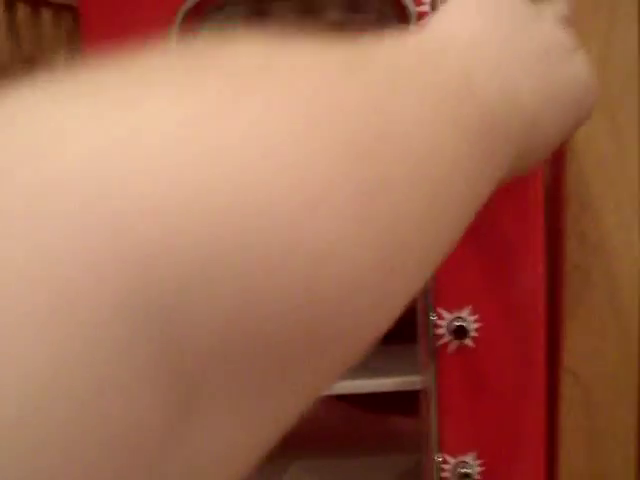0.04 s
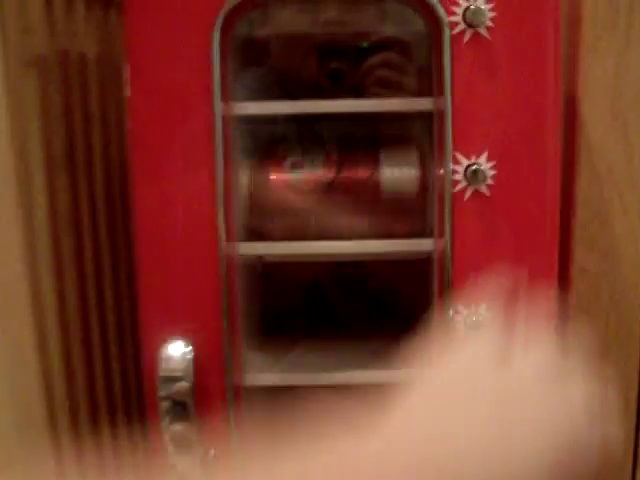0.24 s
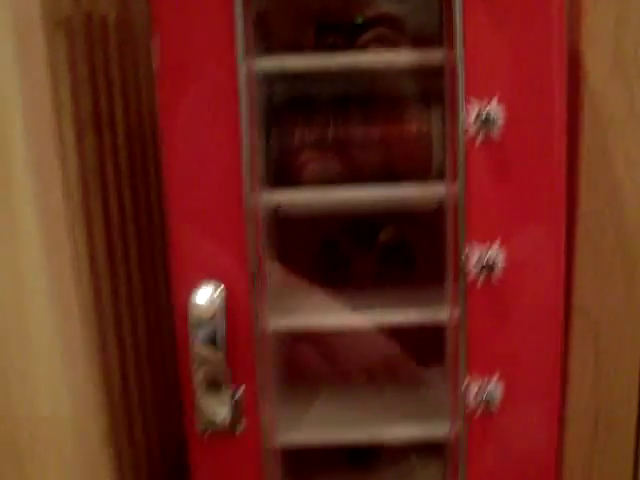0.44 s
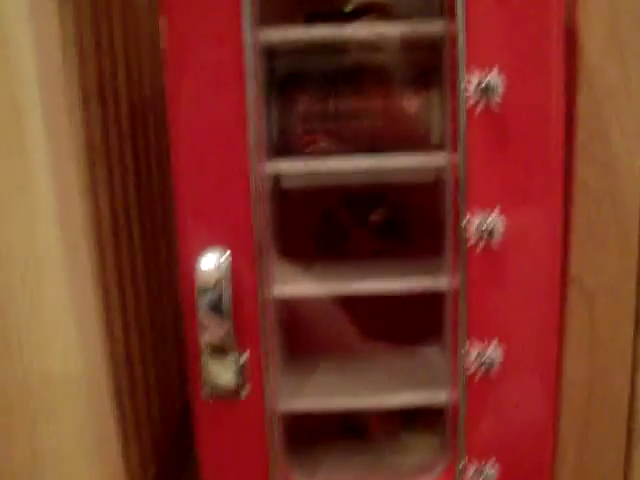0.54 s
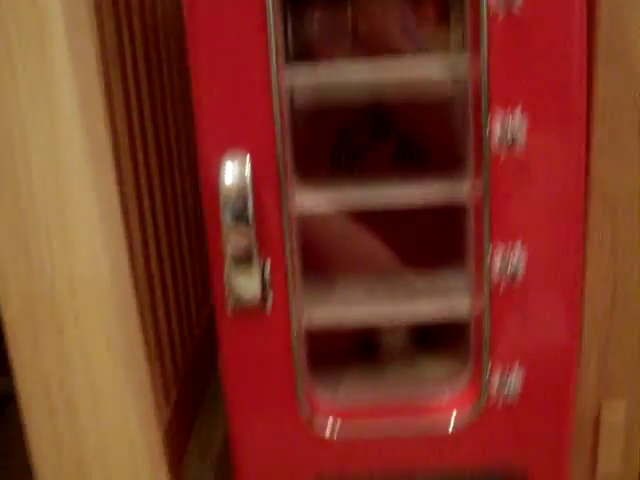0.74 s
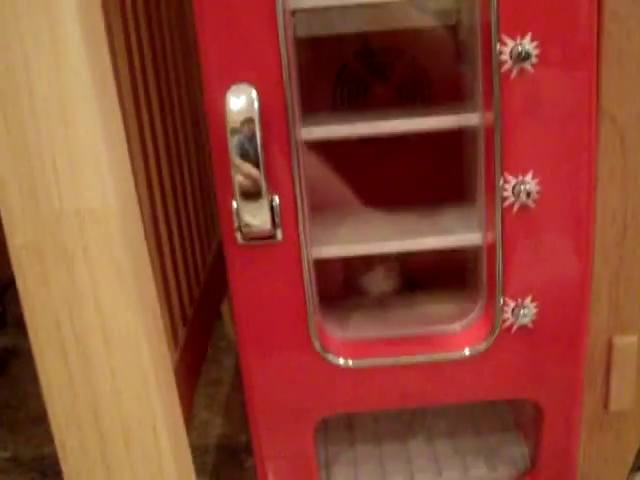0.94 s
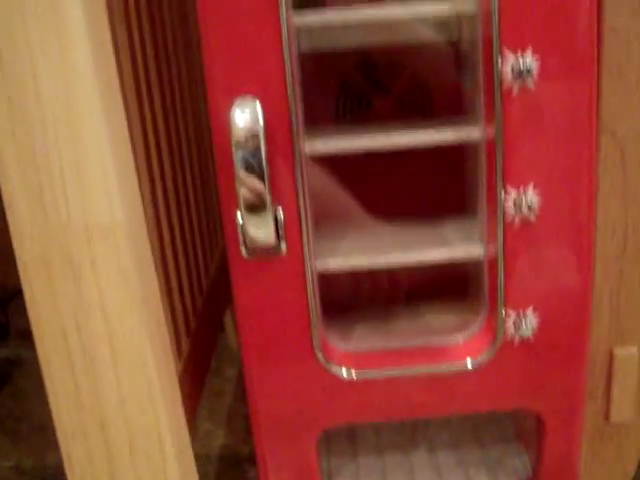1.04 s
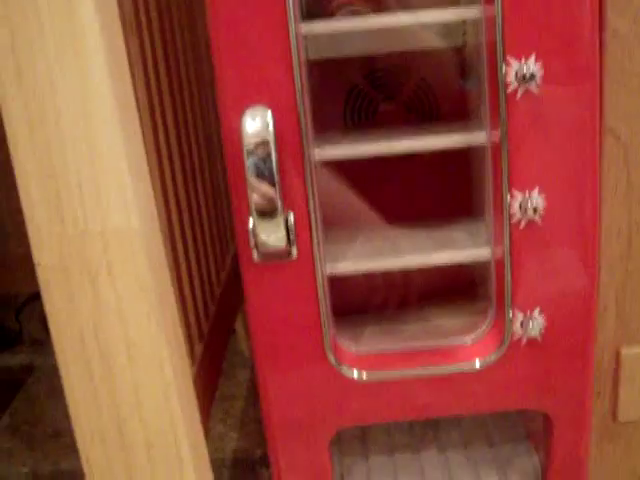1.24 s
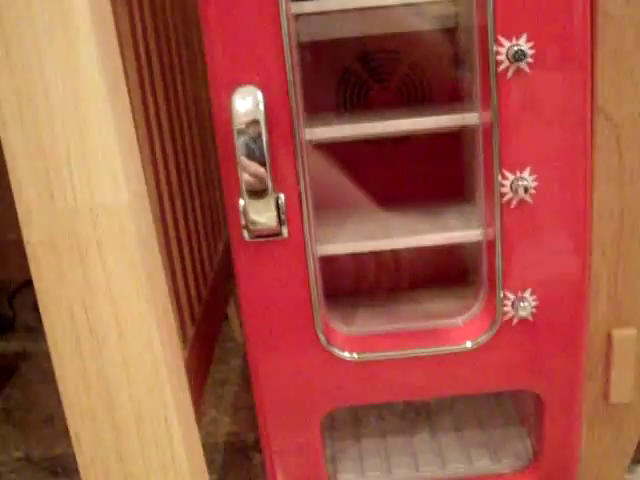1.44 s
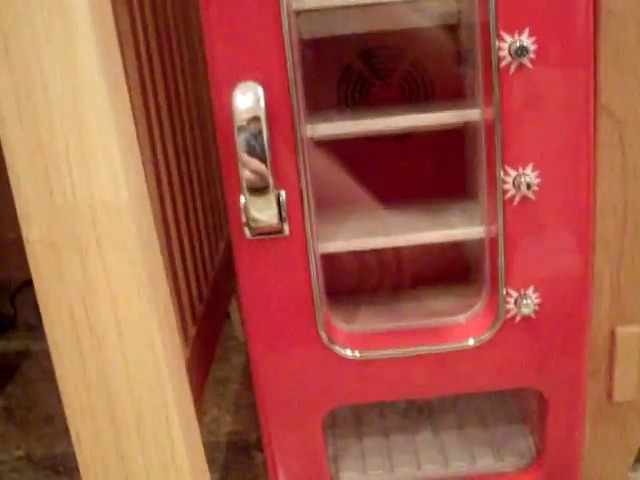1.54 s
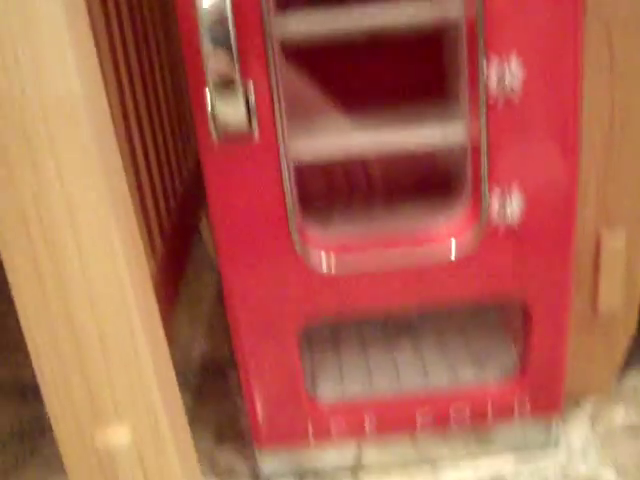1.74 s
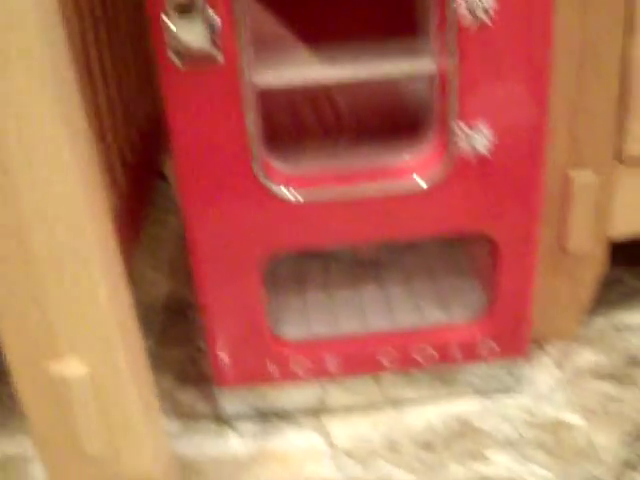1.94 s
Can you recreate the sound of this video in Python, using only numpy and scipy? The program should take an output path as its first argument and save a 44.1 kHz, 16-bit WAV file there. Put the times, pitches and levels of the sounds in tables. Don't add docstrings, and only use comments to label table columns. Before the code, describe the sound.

A can drops through a small vending fridge: a sharp latch snap, loud booming thuds and knocks, a short gap, then a thunk in the plastic tray with quick bounces, over fan hum, close distorted microphone.

```python
import sys
import numpy as np
from scipy import signal
from scipy.fft import rfft, irfft
from scipy.io import wavfile
from scipy.ndimage import uniform_filter1d

SR = 44100
rng = np.random.default_rng(int(sys.argv[2]) if len(sys.argv) > 2 else 0)


def dump_mix(stems):
    frames = np.atleast_2d(stems).T
    limited = np.clip(frames, -1, 1)
    pcm = np.round(limited * 32767).astype(np.int16)
    wavfile.write(sys.argv[1], SR, pcm)


def undo_db(level):
    steps = np.asarray(level, float) / 20
    return 10 ** steps


N = 85995

# start in seconds, cabinet boom in dB, crack in dB,
# boom centre in Hz, damping factor (a multiplier of every decay time).
RELEASE_BLOWS = [
    (.003, -39, -37, 400, 3.3),
    (.122, -23, -41, 140, 2.5),
    (0.168, -39, -31, 990, 0.49),
    (.174, -44.5, -26, 905, 4.5),
    (.194, -25, -2.5, 863, 0.57),
    (0.231, -29, -25.5, 324, 1.2),
    (0.275, -2.5, -23.5, 183.5, 1.7),
    (.279, -19, -24, 466, 0.79),
    (0.309, -24, -34.5, 117, 0.38),
]
TUMBLE_BLOWS = [(.359, 12.5, -11, 159.5, 0.4), (0.367, 2.5, -4.5, 420, 0.48),
                (.374, 9.5, -5.5, 289.7, 0.52), (0.402, 0.5, -19.5, 250, 1.07), (.419, 6, -12.5, 130, 0.27),
                (.427, 16.5, 7.5, 520, 0.43), (.435, 8, -10.5, 165, 0.95), (.458, 9, -8.5, 117, 0.93),
                (.485, -10.5, -14.5, 280, 1.36), (.498, -11.5, -13.5, 300, .8),
                (0.511, -14.5, -19.5, 500, 2.6), (.546, 9.5, -4, 420, 0.35), (.549, 2.5, -16, 173.7, .75),
                (.570, -2.5, -13.5, 270, 0.7), (.595, -3.5, -30, 125, 0.74), (.624, -6, -12.5, 605, 0.53),
                (.626, -9.5, -44, 400, 0.38), (.630, -7.5, -21.5, 181.3, 0.99), (.672, -15, -23, 520, 0.49),
                (0.676, -10, -33, 175, 1.2), (.720, -26, -38.5, 170, 2.6), (0.821, -27, -47, 80, 2.7)]
LANDING_BLOWS = [(1.035, -20, -38.5, 194, 1.1), (1.091, -17, -22, 253, 0.74),
                 (1.109, -17.5, -38.5, 231.5, 1.1), (1.134, -4.5, -30, 185.6, .55),
                 (1.137, -12.5, -42, 464, .55), (1.160, 7.5, 0.5, 443, 0.67), (1.168, 8, -7.5, 179.2, 1.05),
                 (1.194, -7, -22, 303, 0.37), (1.206, -8, -23, 112, 1.7), (1.220, 0.5, -16, 241.5, 0.59),
                 (1.239, -4.5, -22, 179, 0.66), (1.255, -4.5, -29, 236, 1.03), (1.271, -9, -30, 205, 0.37),
                 (1.295, -18, -28.5, 277, 0.4), (1.327, -35, -30, 232, 1.2), (1.366, -48.5, -42, 131, 1.2),
                 (1.410, -34, -45, 100, 1.5), (1.609, -51.5, -60, 290, 0.54)]
# frequency in Hz, level in dB, 60 dB decay time in seconds.
CABINET_MODES = [(73.1, -8.5, 0.61), (117, -5, 0.29), (161.5, -2, 0.13), (174.9, -6.5, .16),
                 (235.7, -11, 0.22), (281.1, -.5, 0.12), (306.4, -19.5, 0.48), (387, -3, .13),
                 (456.6, -3.5, 0.16), (525, -4, 0.064), (611.3, 8.5, 0.058), (820, -4, 0.034),
                 (862, -12, 0.27), (990, -11.5, 0.1)]
# frequency in Hz, level in dB per Hz.
CRACK_SPECTRUM = [(80, -15), (250, 5.5), (600, 5.7), (1300, 2), (2700, -5), (4000, -8.5), (5500, -12.5)]
# frequency in Hz, 60 dB decay time in seconds.
ROOM_DECAY = [(100, 0.4), (400, 0.46), (1500, 0.32), (5000, 0.37)]
# frequency in Hz, line width in Hz, level in dB.
MOTOR_LINES = [(44, 8, -54.5), (173, 30, -54), (290, 8.7, -50), (299, 11, -57), (329, 12, -75.5),
               (1254, 49, -56.5), (1882, 60, -54.5)]
# frequency in Hz, level in dB per Hz.
AIR_SPECTRUM = [(30, -16.5), (100, -13), (200, -1), (400, -4), (1400, -7.5), (1650, -12.5), (2100, -11),
                (5000, -19)]
# time in seconds, level in dB.
GRIP_LEVEL = [(0, -40), (.15, -42), (.23, -24), (.3, -44), (0.601, -35), (0.902, -41.5), (1.098, -36.5),
              (1.5, -50.5), (1.95, -54)]
# frequency in Hz, level in dB per Hz.
GRIP_SPECTRUM = [(15, -2), (40, -3), (80, -4.8), (130, -10.5), (300, -41.5)]
# frequency in Hz, level in dB.
GRIT_SPECTRUM = [(200, -11), (1000, -5.5), (3000, -6.5), (5000, 0.5)]
# frequency in Hz, gain in dB.
PASS_BAND = [(2800, 0), (3100, -8), (3250, -28), (3330, -58), (3450, -58), (3530, -32), (3700, -11),
             (3900, -2), (5150, -1), (5300, -8), (5450, -25), (5560, -60), (5700, -100)]


def unit_rms(x):
    return x / np.sqrt(np.mean(x ** 2) + 1e-20)


def read(points, hz):
    f, value = np.transpose(points)
    return np.interp(np.log(hz + 1), np.log(f + 1), value)


def colour(x, spectrum):
    hz = np.fft.rfftfreq(len(x), 1 / SR)
    return irfft(rfft(x) * undo_db(read(spectrum, hz)), len(x))


def add(mix, start_s, sound):
    part = mix[round(start_s * SR):][:len(sound)]
    part += sound[:len(part)]


def boom(db, centre_hz, damping):
    spread_octaves, rise_s, detune, spot_db = 0.71, 0.0024, 0.019, 1.5
    panel = (centre_hz, 4, 0.11)  # Hz, dB, decay in seconds
    t = np.arange(SR // 2) / SR
    hz, mode_db, t60 = np.transpose(CABINET_MODES + [panel])[:, :, None]
    spot, tune = rng.standard_normal((2, len(hz), 1))
    octaves_away = np.log2(hz / centre_hz)
    level_db = mode_db + spot_db * spot - 6 * (octaves_away / spread_octaves) ** 2
    decay = undo_db(level_db - 60 * t / (t60 * damping))
    modes = decay * np.sin(2 * np.pi * hz * (1 + detune * tune) * t - hz / 120)
    rise = (1 - np.exp(-t * centre_hz / 200 / rise_s)) ** 2
    return undo_db(db) * modes.sum(0) * rise / np.linalg.norm(undo_db(level_db))


def crack(db, centre_hz, damping):
    rise_s, burst_t60 = 0.0013, 0.074
    chatter_per_s, chatter_db, chatter_t60, panel_t60 = 1500, -17.5, 0.29, 0.04
    tick_db, tick_delay_s = 7, .001
    dull_hz, dull_db_per_octave = 400, 2.5
    t = np.arange(SR // 3) / SR
    burst, size, ring = rng.standard_normal((3, len(t)))
    burst = burst * (1 - np.exp(-t / rise_s)) * undo_db(-60 * t / (burst_t60 * damping))

    hits = rng.random(len(t)) < chatter_per_s / SR
    ticks = size * hits * undo_db(chatter_db - 60 * t / (chatter_t60 * damping))
    ring = ring[:2000] * undo_db(-60 * t[:2000] / panel_t60)
    noise = burst + signal.fftconvolve(ticks, ring)[:len(t)]
    noise[int(tick_delay_s * SR)] += undo_db(tick_db)

    tilt = dull_db_per_octave * np.log2(centre_hz / dull_hz)
    tone = [(hz, level + tilt * np.log2(hz / 1500)) for hz, level in CRACK_SPECTRUM]
    lead = np.zeros(300)
    return undo_db(db) * colour(np.r_[lead, noise, lead], tone)[len(lead):]


def room(x):
    hz, t, z = signal.stft(rng.standard_normal(SR), SR, nperseg=512)
    decay = undo_db(-60 * t / read(ROOM_DECAY, hz)[:, None])
    tail = signal.istft(z * decay, SR, nperseg=512)[1]
    tail = np.r_[np.zeros(200), tail]
    return signal.fftconvolve(x, tail / np.linalg.norm(tail))[:N]


def fan_air():
    air_db, patch_db = -42.5, .8
    frames, hz = N // 256 + 5, np.fft.rfftfreq(1024, 1 / SR)
    a, b, patches = rng.standard_normal((frames, 513, 3)).T
    patches = uniform_filter1d(patches, size=10, axis=0)
    patches = unit_rms(uniform_filter1d(patches, size=12, axis=1))
    z = (a + 1j * b) * undo_db(read(AIR_SPECTRUM, hz)[:, None] + patch_db * patches)
    return undo_db(air_db) * unit_rms(signal.istft(z, nperseg=1024, noverlap=768)[1][:N])


def motor():
    blade_hz, blade_db, blade_wander_hz = 290.3, -43, 2.08
    t, out = np.arange(N) / SR, np.zeros(N)
    for hz, width, db in MOTOR_LINES:
        r = np.exp(-np.pi * width / SR)
        push = rng.standard_normal(N) + 1j * rng.standard_normal(N)
        push[0] += np.sqrt(SR / width)
        drift = signal.lfilter([1], [1, -r], push)
        out += undo_db(db) * unit_rms((drift * np.exp(2j * np.pi * hz * t)).real)
    wander = unit_rms(uniform_filter1d(rng.standard_normal(N), size=6000))
    phase = 2 * np.pi * np.cumsum(blade_hz + blade_wander_hz * wander) / SR
    return out + undo_db(blade_db) * np.sin(phase)


def grip():
    s, db = np.transpose(GRIP_LEVEL)
    level = undo_db(np.interp(np.arange(N) / SR, s, db))
    return level * unit_rms(colour(rng.standard_normal(N), GRIP_SPECTRUM))


def scene():
    room_db, crack_gain = -8.5, 2.92
    knocks = np.zeros(N)
    for start_s, boom_db, crack_db, centre_hz, damping in RELEASE_BLOWS + TUMBLE_BLOWS + LANDING_BLOWS:
        add(knocks, start_s, boom(boom_db, centre_hz, damping))
        add(knocks, start_s, crack_gain * crack(crack_db, centre_hz, damping))
    return (knocks + undo_db(room_db) * room(knocks) + fan_air() + motor() + grip())[None]


def band_limit(x):
    return signal.sosfilt(signal.butter(12, 5550, fs=SR, output="sos"), x)


def record(dry):
    mute_s, mute_end_s, mute_db = .352, .3588, -22
    sub_cut_hz, headroom = 26, 1.04
    grit_db, grit_from = -16.5, 0.4
    stage_gain, knee = 1.05, 22
    t = np.arange(N) / SR
    muted = (t > mute_s) & (t < mute_end_s)
    mute = uniform_filter1d(np.where(muted, undo_db(mute_db), 1.), size=40)
    x = signal.lfilter(*signal.butter(1, sub_cut_hz, "high", fs=SR), dry * mute)

    x = np.clip(x, -headroom, headroom)
    strain = np.maximum(uniform_filter1d(abs(x), size=400) - grit_from, 0)
    x = x + undo_db(grit_db) * 10 * strain * colour(rng.standard_normal(N), GRIT_SPECTRUM)

    hz = np.linspace(0, SR / 2, 4097)
    taps = signal.firwin2(4095, hz, undo_db(read(PASS_BAND, hz)), window=("kaiser", 10), fs=SR)
    x = stage_gain * signal.oaconvolve(x, taps[None], "same")
    finished = x / (1 + abs(x) ** knee) ** (1 / knee)
    return band_limit(finished)


dry = scene()
out = record(dry)
dump_mix(out)
```